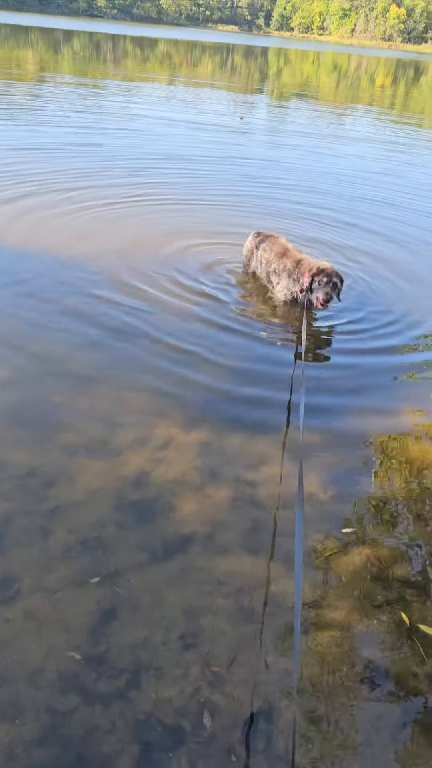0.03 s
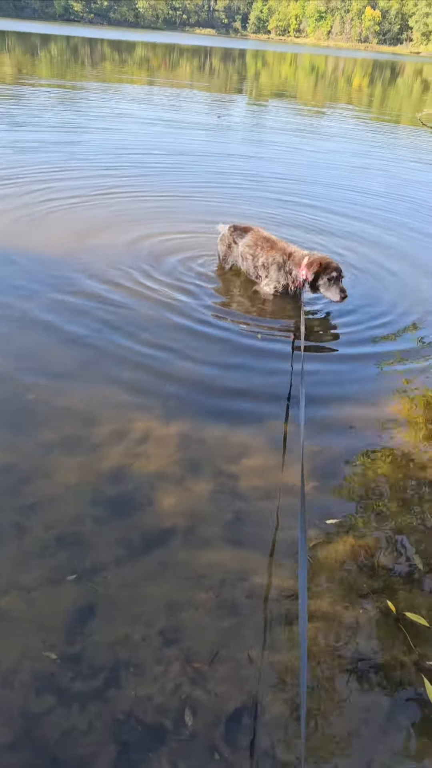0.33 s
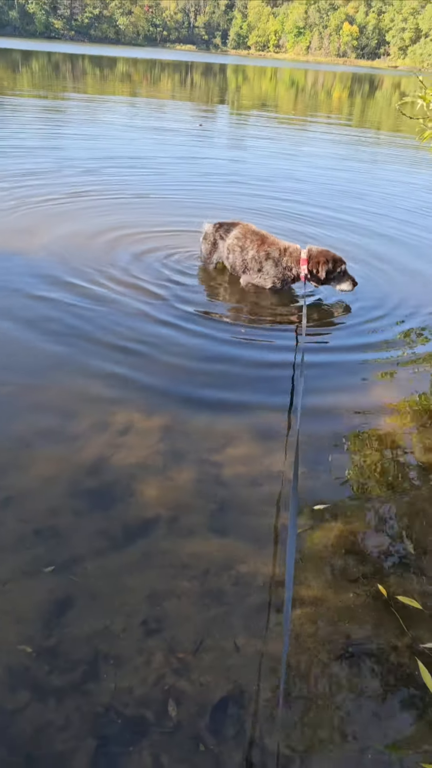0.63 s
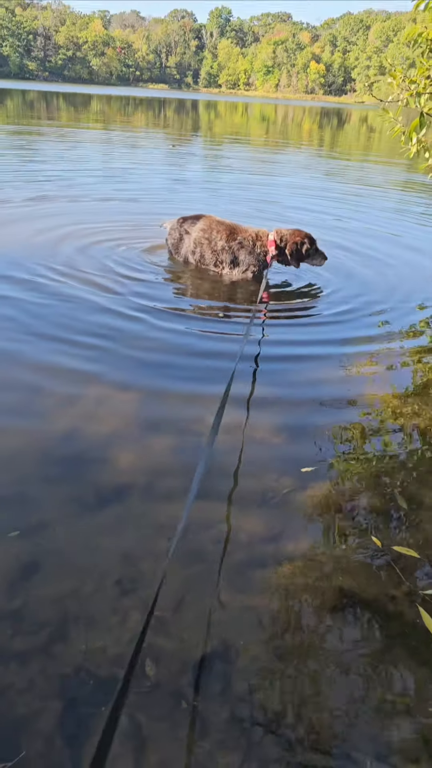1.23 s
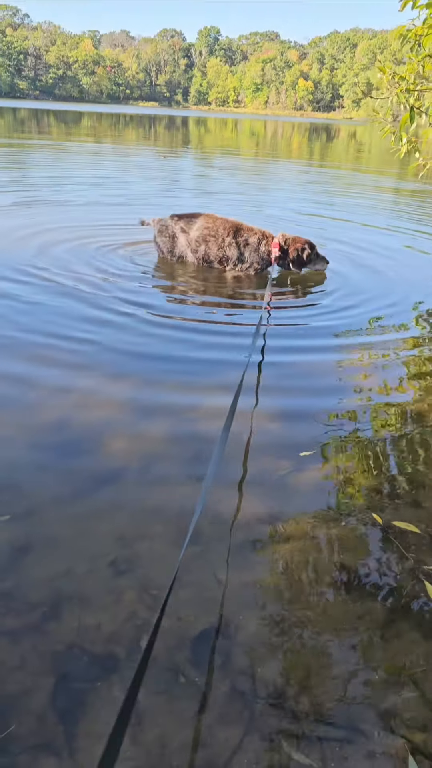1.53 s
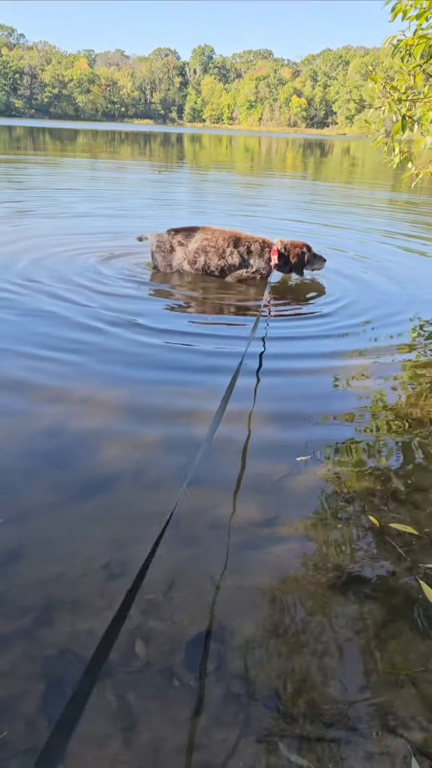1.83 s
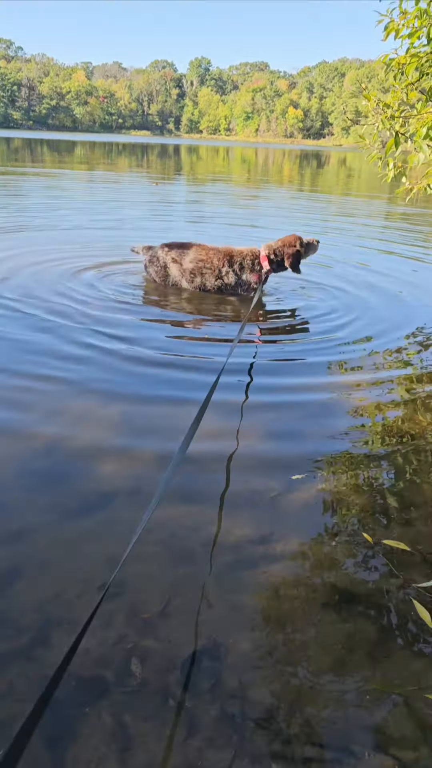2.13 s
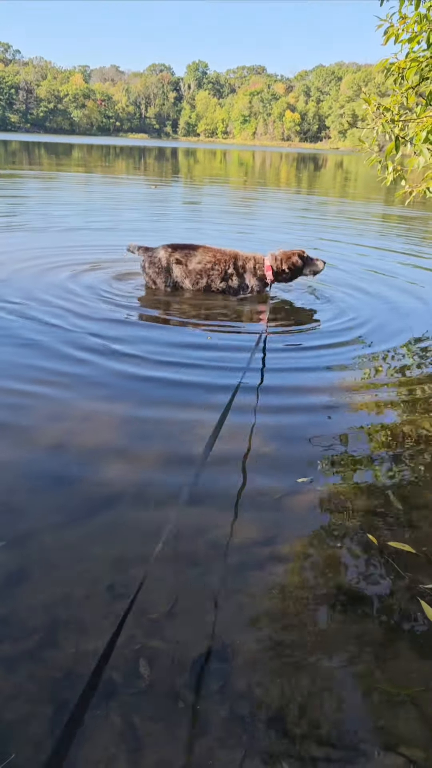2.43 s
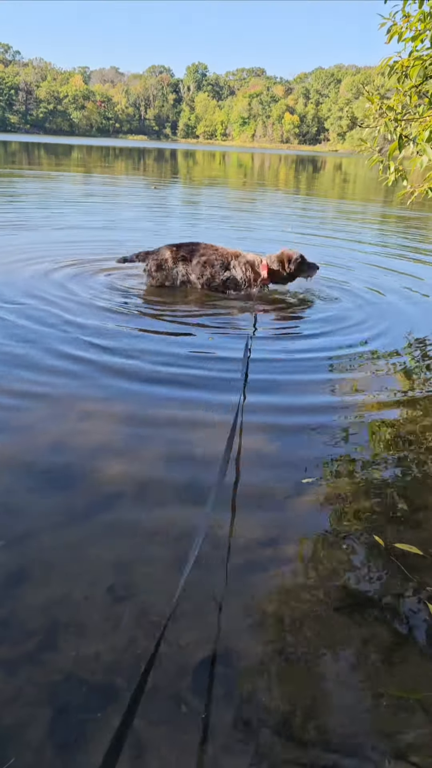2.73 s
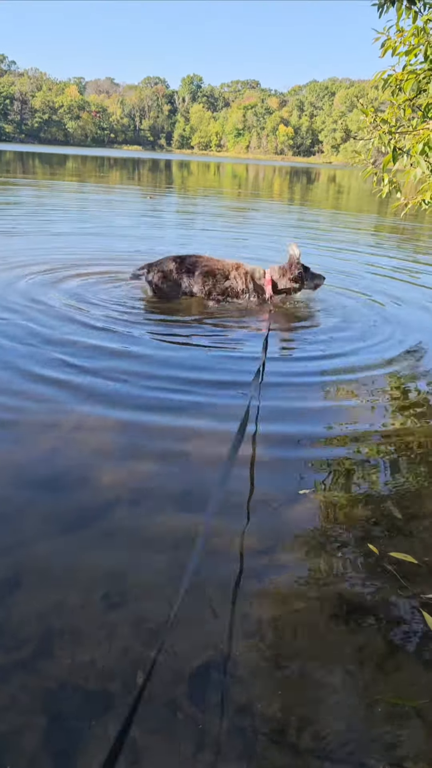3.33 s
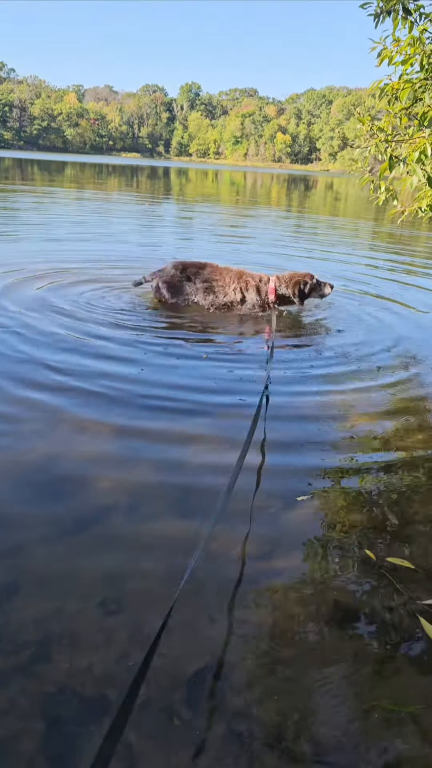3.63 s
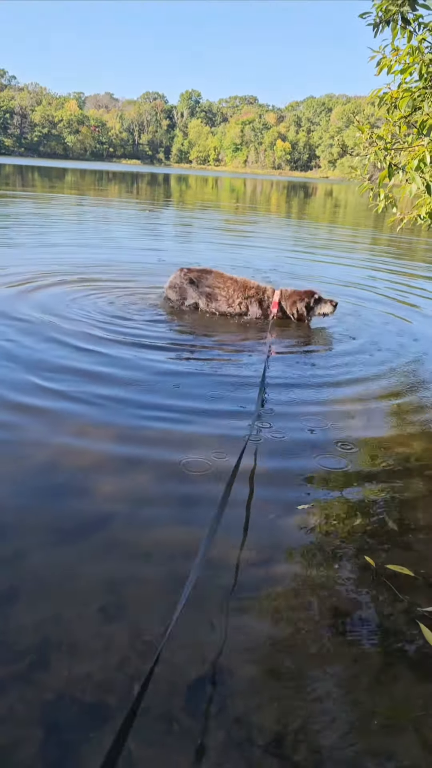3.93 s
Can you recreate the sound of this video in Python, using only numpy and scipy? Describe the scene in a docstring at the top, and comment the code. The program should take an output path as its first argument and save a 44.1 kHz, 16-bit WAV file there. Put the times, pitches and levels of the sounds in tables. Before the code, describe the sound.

A wet dog's head shake is the main sound, heard from a lake shore. Low rumble, faint insects, rustling and lapping run throughout, with soft bumps and leash ticks around 0.5 seconds. Two loud snaps crack close by at 1.6 and 1.8. From 2.5 to 4 seconds, collar tags jingle, wet ears slap and spray patters down among small bubbles. A low hum swells near 2.3 and 3.2.

```python
"""A calm lake, heard in stereo from the shore; a wet dog stands in the water a few metres out.
Low rumble, thin hiss from the trees and far insects run throughout, with rustling and lapping.
The leash ticks, soft bumps sound, a faint thin tone sounds once, and two sharp snaps crack close by.
A low hum swells twice, just before and during a shake of the dog's head from about 2.5 s:
collar tags jingle, wet ears slap, and spray falls back on the lake among small ringing bubbles."""
import sys
import numpy as np
from scipy import signal
from scipy.fft import rfft, irfft
from scipy.io import wavfile

SR = 44100
rng = np.random.default_rng(int(sys.argv[2]) if len(sys.argv) > 2 else 0)


def dump_mix(stems):
    """Bounce the given channels to the path in sys.argv[1] as a 16-bit WAV at rate SR."""
    frames = np.atleast_2d(stems).T  # one column per channel
    limited = np.clip(frames, -1, 1)  # hard clip at full scale
    pcm = np.round(limited * 32767).astype(np.int16)
    wavfile.write(sys.argv[1], SR, pcm)


N = 176400

# Open air at the shore. Each row: frequency in Hz, level in dB.
AIR_COLOUR = [(18, -36), (40, -5.5), (70, -2), (115, -3.5), (150, -11), (200, -16.5), (260, -19),
              (380, -37.5), (520, -34), (950, -42), (1500, -47), (2800, -67), (4000, -47), (5200, -44.5),
              (6500, -50.5), (8200, -45), (10000, -68), (13000, -65), (16000, -64)]
# How alike the air is at the two microphones. Each row: frequency in Hz, correlation.
AIR_LIKENESS = [(100, 0.99), (300, 0.96), (800, 0.37), (2000, 0.11), (8000, 0.068)]
# Far insects in the trees. Each row: centre in Hz, width in Hz, level in dB.
INSECT_BANDS = [(4847, 200, -71.5), (6590, 280, -75)]
# Course of the insects, the rustle and the lapping. Each row: time in seconds, level in dB.
INSECT_LEVEL = [(0, -2.5), (1, 0.5), (1.35, 0.5), (2, 1), (2.4, 4), (4, 7)]
RUSTLE_LEVEL = [(0, -73), (.5, -70), (.6, -61), (.68, -50.5), (.78, -52), (.88, -63), (1.1, -66.5),
                (1.5, -67.5), (1.64, -57.5), (1.74, -64), (1.86, -56.5), (2.0, -57), (2.1, -60.5),
                (2.2, -56.5), (2.35, -63.5), (2.55, -66), (4, -56)]
LAP_LEVEL = [(0, -90), (.45, -59.5), (.6, -56), (.82, -56), (1, -60.5), (1.8, -62.5), (1.96, -59.5),
             (2.15, -64), (2.36, -59), (2.44, -51.5), (2.65, -62), (3.3, -55.5), (4, -65)]
# Spectra of rustle, lapping, bumps, snaps, spray and collar clicks. Each row: frequency in Hz, dB.
RUSTLE_SPECTRUM = [(300, 7), (1000, 3), (2000, 5), (2800, 1.5), (3600, 4), (6000, 3.5), (10000, -6.5),
                   (13000, -3), (16000, -7)]
LAP_SPECTRUM = [(100, 0), (250, -3.5), (500, -6), (900, -19.5), (2500, -36), (8000, -74)]
BUMP_SPECTRUM = [(50, -26), (130, 5.5), (270, 2.5), (550, 2), (850, -14.5), (1050, -20.5), (1300, -10),
                 (1500, -20), (2500, -32.5), (8000, -59)]
SNAP_SPECTRUM = [(100, -3), (500, -2.5), (1300, -3), (2200, 0), (2900, -1.5), (3350, 7.5), (4200, 4),
                 (4900, -0.5), (7200, 3), (9600, -3), (11600, -3), (13000, -33), (16000, -28)]
SPRAY_SPECTRUM = [(2500, 3), (4000, 0.5), (6500, 2), (9000, 2.5), (10600, -10), (12000, 6.5), (15500, 2.5)]
CLICK_SPECTRUM = [(500, -20.5), (3300, -3.5), (4500, -2.5), (6500, 3), (8800, -1.5), (12000, 0), (15500, 7)]
# Ticks of the leash. Each row: start in seconds, level in dB, centre in Hz.
LEASH_TICKS = [(0.202, -43, 960), (0.208, -50.5, 3450), (0.207, -55, 8150), (0.248, -54, 4800),
               (0.678, -34, 1730), (0.679, -44.5, 6840), (2.152, -55.5, 7900)]
# Knocks on the shore. Each row: start in seconds, level in dB, decay in seconds,
# treble tilt in dB per octave, blow over rattle in dB.
SHORE_BUMPS = [(0.5023, -29, 0.0092, -8, 3), (0.514, -38, 0.044, -6, -9), (0.5575, -33, .006, -16, 0),
               (.5615, -37.5, 0.0056, -17, -3), (1.938, -40.5, .0095, 0, 1), (2.392, -41.5, 0.024, -8, -11)]
# The faint tone and the hum's swells. Each row: start and length in seconds, pitch in Hz, level in dB.
FAINT_TONE = [(1.509, 0.073, 1950, -61)]
HUM_SWELLS = [(2.275, 0.18, 121.4, -38.5), (3.151, .33, 120.4, -38.5)]
# Close snaps. Each row: start in seconds, left and right level in dB,
# left and right treble tilt in dB per octave, body pitch in Hz, body level in dB.
CLOSE_SNAPS = [(1.5864, 0.5, 11, -8, 6.5, 2520, -22), (1.8083, 11, 14, -4.5, 0.5, 1330, -17.5)]
# Bubbles in the lake. Each row: start in seconds, pitch in Hz, level in dB, decay in seconds,
# rise in octaves per second.
LAKE_BUBBLES = [(1.939, 255, -40.5, 0.019, 2), (2.93, 260, -36, 0.016, 7.9), (2.970, 630, -39.5, 0.024, 29),
                (3.278, 1800, -47, 0.0088, 18), (3.334, 249, -39.5, 0.018, 3.6),
                (3.408, 1200, -46, 0.008, 19), (3.431, 1780, -36, 0.0051, 36),
                (3.519, 1610, -47, 0.0061, 2), (3.552, 500, -31, 0.0072, 0.97),
                (3.554, 1305, -44, 0.023, 0.91), (3.648, 640, -44, 0.0074, 9.4),
                (3.71, 596, -40.5, 0.0066, 7.6), (3.737, 423, -37.5, 0.0046, 20),
                (3.795, 700, -42.5, 0.0093, 5.1), (3.791, 1064, -48, 0.011, 6.9),
                (3.846, 1250, -30, 0.003, 78), (3.905, 650, -48.5, 0.0081, 6.1),
                (3.948, 1083, -42.5, 0.011, 8.9)]
# Water falling around the dog. Each row: time in seconds, patter level in dB, plop level in dB.
SPRAY_LEVELS = [(2.4, -110, -110), (2.55, -73, -63.5), (2.7, -61, -68), (2.9, -65, -63.5),
                (3.0, -61, -46.5), (3.045, -50, -72), (3.15, -49.5, -51), (3.22, -55, -61.5),
                (3.33, -51, -57.5), (3.41, -53, -51.5), (3.5, -50, -61), (3.57, -57.5, -50),
                (3.62, -58, -52.5), (3.705, -44, -55), (3.73, -60, -54.5), (3.82, -55.5, -53),
                (4, -72, -67)]
# Modes of each metal piece on the collar. Each row: pitch in Hz, level in dB, seconds to fall 60 dB.
METAL_MODES = { "tag": [(6230, -19, .06), (6975, -1.5, .11), (7060, -2, .1), (7320, -7, .08),
               (7450, -7, .08), (10230, -11, .14), (11600, -12, .07), (12935, -5.5, .14),
               (13000, -5.5, .14), (13120, -9, .09), (15385, -8, .11), (15490, -9, .1)],
               "ring": [(5890, -10, .06), (6088, -2, .07), (6240, -9, .05), (6462, -8, .05),
               (6540, -7, .06), (7130, -10, .06), (10900, -15, .08), (12470, -8, .09), (14970, -8, .08)],
               "clip": [(4500, -16, .07), (6590, -6, .06), (6713, -5, .08), (7520, -13, .05),
               (9800, -14, .09), (11750, -11, .06), (12730, -8.5, .12), (13350, -10, .07),
               (14730, -11, .07), (15140, -4, .13)]}
# Strikes on the collar. Each row: start in seconds, piece, level in dB, treble tilt in dB per octave,
# relative click level in dB, right over left in dB.
COLLAR_CLINKS = [(2.566, "tag", -48, -0.5, 8, -2), (2.579, "tag", -36, 8, 8, -1.5),
                 (2.621, "tag", -44.5, -1.5, 3, 3.5), (2.696, "tag", -46, -9, 4, 4),
                 (2.714, "tag", -40, -6, -30, 5), (2.752, "tag", -32.5, -5.5, -8.5, -2),
                 (2.7659, "tag", -33, -10.5, -11.5, 7.5), (2.8112, "ring", -38, -4, 1, -1),
                 (2.829, "ring", -45.5, -4.5, -4, 13), (2.859, "tag", -44, -2.5, -4, 0),
                 (2.906, "tag", -46.5, -1, 0.5, -3), (2.9621, "tag", -33.5, 5, 8, -1),
                 (2.9741, "tag", -31, -16, -21, 9.5), (2.989, "tag", -32, -0.5, -15, 1),
                 (3.004, "ring", -36.5, -2.5, 1, 0), (3.108, "clip", -31.5, -7, -20, 4),
                 (3.1167, "clip", -30, -1, -10, -6), (3.132, "ring", -26, -4.5, -8.5, -1),
                 (3.1349, "ring", -32, -8, -18, 9), (3.3046, "clip", -37, -5, -17, 2.5),
                 (3.317, "clip", -41, 0, 5, 0), (3.3924, "clip", -38, 1.5, 5, 2),
                 (3.405, "clip", -32.5, -1, 0.5, 1), (3.633, "clip", -51, -4, 6, 0),
                 (3.7141, "ring", -44, -0.5, 11, 0), (3.8937, "clip", -28, -5, -17, 1.5),
                 (3.938, "clip", -45.5, 8, 10, -9), (3.944, "clip", -34, 2, 3, 0)]
# Wet ears and jowls. Each row: start in seconds, bass, middle and treble level in dB,
# decay in seconds, blow over splatter in dB, right over left in dB.
EAR_SLAPS = [(2.695, -60, -46, -63, 0.0054, -8, 10), (2.779, -47, -41.5, -38, .0051, -15, 1),
             (2.813, -50, -51, -40, 0.0043, 1, 5), (2.860, -60, -43, -33, 0.002, 9, -1),
             (2.926, -37, -38.5, -63, 0.0041, -21, 10.5), (2.9356, -40, -41, -34.5, 0.0051, 0, 4),
             (3.060, -73, -49, -41.5, 0.01, -18, 1), (3.0655, -31.5, -31.5, -44, 0.0025, 9, -0.5),
             (3.1425, -30, -35, -47, 0.0049, 0, 5.5), (3.1705, -29, -28.5, -26, 0.0036, -2, -1.5),
             (3.207, -34.5, -45, -50, 0.0024, 5, -2), (3.2662, -37, -26, -36, 0.0034, 3, -0.5),
             (3.341, -38, -42.5, -44, 0.009, -5, 5.5), (3.3763, -24, -24, -26.5, 0.002, 0, -2),
             (3.431, -53, -28, -55, 0.002, -7, -2), (3.478, -36, -32, -37, 0.0034, 13, -1),
             (3.537, -39, -37, -38.5, 0.0063, -15, -2), (3.5425, -30.5, -36, -31.5, .002, 10, 10),
             (3.5457, -24, -26.5, -32, 0.002, 9, 16.5), (3.5497, -29, -29, -54, 0.002, 0, -5),
             (3.564, -45, -60, -66, 0.005, -8, 9)]
# Bass, middle and treble of a slap. Each row: low and high edge in Hz.
SLAP_BANDS_HZ = [(180, 670), (1200, 2360), (3300, 8700)]
# Water flung off the head. Each row: start in seconds, level in dB, centre in Hz, length in seconds.
FLINGS = [(2.825, -45, 5930, 0.015), (2.992, -45, 5700, .03), (3.055, -46, 4330, 0.048),
          (3.244, -55, 5740, 0.032), (3.262, -47, 6400, 0.023), (3.484, -47, 6400, .012),
          (3.603, -45, 5900, .012), (3.657, -51, 7180, .012), (3.686, -46, 5400, .02),
          (3.713, -43, 4740, 0.017)]


def amp(db):
    """Decibels to gain."""
    return 10 ** (np.asarray(db) / 20)


def unit(x):
    """Scales to rms 1."""
    return x / np.sqrt(np.mean(x ** 2) + 1e-20)


def read(points, hz):
    """Reads a spectrum on a log-frequency axis."""
    knots_hz, values = np.transpose(points)
    return np.interp(np.log(hz + 1), np.log(knots_hz + 1), values)


def level(points, column=1):
    """Gain over time from a dB curve."""
    rows = np.array(points)
    return amp(np.interp(np.arange(N) / SR, rows[:, 0], rows[:, column]))


def add(mix, start, sound, right_db=0):
    """Places a sound in the stereo mix."""
    part = mix[:, round(start * SR):][:, :sound.shape[-1]]
    part += (amp([[-right_db / 2], [right_db / 2]]) * sound)[:, :part.shape[1]]


def colour(x, points, tilt_db=0):
    """Causal filter of unit energy with the given spectrum, tilted above about 3 kHz."""
    hz = abs(np.fft.fftfreq(4096, 1 / SR))
    log_gain = np.log(amp(read(points, hz) + tilt_db * np.log2(1 + hz / 3000)))
    minimum_phase = np.exp(np.conj(signal.hilbert(log_gain)))
    taps = np.fft.ifft(minimum_phase).real[:len(hz) // 2]
    return signal.fftconvolve(x, taps[None] / np.linalg.norm(taps), axes=1)[:, :x.shape[1]]


def band(x, lo_hz, hi_hz):
    """Band-pass."""
    sos = signal.butter(2, [lo_hz, min(hi_hz, SR / 2 - 1000)], "band", fs=SR, output="sos")
    return signal.sosfilt(sos, x)


def pair(size, apart=0.53):
    """Noise at two microphones: identical when apart is 0, unrelated at 1."""
    mid, side = rng.standard_normal((2, size))
    return unit(np.array([mid + apart * side, mid - apart * side]))


def blow(rattle, start, db):
    """One firm push, alike on both sides, on top of a loose rattle."""
    out = rattle / np.linalg.norm(rattle, axis=1, keepdims=True)
    out[:, round(start * SR)] -= amp(db)
    return out


def echo(x, t60=0.13):
    """Thin, quick scatter from the bank and the trees."""
    t = np.arange(SR // 2) / SR
    tail = rng.standard_normal((2, len(t))) * amp(-60 * t / t60) * (t > .003)
    return signal.fftconvolve(x, tail / np.linalg.norm(tail[0]), axes=1)[:, :N]


def air(db=-46, sway_db=1.5):
    """Swaying low rumble, alike at both microphones, under a thin wide hiss from the trees."""
    hz = np.fft.rfftfreq(N, 1 / SR)
    left, other = rfft(rng.standard_normal((2, N)))
    alike = np.clip(read(AIR_LIKENESS, hz), -1, 1)
    right = alike * left + np.sqrt(1 - alike ** 2) * other
    spectrum = np.array([left, right]) * amp(read(AIR_COLOUR, hz))
    low = 1 / (1 + (hz / 250) ** 4)
    sway = unit(irfft(rfft(rng.standard_normal(N)) * (hz < 9), N))
    rumble = irfft(spectrum * low, N) * amp(sway_db * sway)
    hiss = irfft(spectrum * (1 - low), N)
    return amp(db) * unit(rumble + hiss) * amp([[.4], [-.4]])


def insects(throb_db=2):
    """A thin, throbbing shrill from far off in the trees, slowly growing."""
    throb = unit(amp(throb_db * unit(band(rng.standard_normal(N), 11, 44))))
    shrill = sum(amp(db) * unit(band(pair(N, 1.0), hz - width / 2, hz + width / 2))
                 for hz, width, db in INSECT_BANDS)
    return level(INSECT_LEVEL) * throb * shrill


def rustle():
    """A soft, wide rustle near the microphones."""
    return level(RUSTLE_LEVEL) * colour(pair(N, 1.0), RUSTLE_SPECTRUM)


def lapping():
    """Low lapping water, near the centre of the stereo image."""
    return level(LAP_LEVEL) * colour(pair(N, 0.073), LAP_SPECTRUM)


def leash(decay=.004):
    """Small ticks of the leash, each a narrow burst of noise."""
    out, t = np.zeros((2, N)), np.arange(SR // 5) / SR
    for start, db, hz in LEASH_TICKS:
        burst = 3 * pair(len(t)) * np.exp(-t / decay)
        add(out, start, amp(db) * band(burst, hz * .84, hz * 1.19))
    return out


def bumps():
    """Dull knocks on the shore, each a blow and a dying rattle."""
    out, t = np.zeros((2, N)), np.arange(SR // 5) / SR
    for start, db, decay, tilt_db, blow_db in SHORE_BUMPS:
        shape = np.exp(-t / decay)
        impact = blow(pair(len(t), 0.31) * shape, 0, blow_db)
        knock = unit(colour(impact, BUMP_SPECTRUM, tilt_db))
        add(out, start, amp(db) * knock * np.sqrt(np.mean(shape ** 2)), right_db=-1)
    return out


def faint_tone():
    """One faint, blurred tone near 1950 Hz, just before the first snap."""
    out = np.zeros((2, N))
    for start, length, hz, db in FAINT_TONE:
        t = np.arange(0, length, 1 / SR)
        tone = unit(band(pair(SR // 4), hz - 50, hz + 50))[:, :len(t)]
        add(out, start, amp(db) * np.sin(np.pi * t / length) * tone)
    return out


def snaps(left_lag_s=.00044, reflection_s=0.0029, echo_db=-28.5):
    """Close cracks with a brief hollow ring and one near reflection, reaching the right side first."""
    out, t = np.zeros((2, N)), np.arange(SR // 20) / SR
    for start, left_db, right_db, left_tilt, right_tilt, body_hz, body_db in CLOSE_SNAPS:
        crack = rng.standard_normal((2, len(t))) * np.exp(-t / 0.0017)
        crack *= amp(-10) / np.linalg.norm(crack, axis=1, keepdims=True)
        crack[:, 0] += 1  # the direct pulse, 10 dB over its noisy tail
        crack[:, round(reflection_s * SR)] += amp(-20)
        body = amp(body_db) * np.exp(-t / 0.0015) * np.cos(2 * np.pi * body_hz * t)
        left = body + amp(left_db) * colour(crack, SNAP_SPECTRUM, left_tilt)
        right = body + amp(right_db) * colour(crack, SNAP_SPECTRUM, right_tilt)
        add(out, start + left_lag_s, left * [[1], [0]])
        add(out, start, right * [[0], [1]])
    return out + amp(echo_db) * echo(out)


def bubbles():
    """Single bubbles in the lake ring and rise in pitch as they die away."""
    out, t = np.zeros((2, N)), np.arange(SR // 25) / SR
    for start, hz, db, decay, rise in LAKE_BUBBLES:
        turns = np.cumsum(hz * 2 ** (rise * np.minimum(t, 3 * decay))) / SR
        shape = (1 - np.exp(-t / 0.00026)) * np.exp(-t / decay) * (1 - (t / t[-1]) ** 4)
        tone = np.sin(2 * np.pi * turns + np.array([[0], [.6]]))
        add(out, start, amp(db) * shape * tone, right_db=1)
    return out


def hum():
    """A low hum swells and fades, gliding slightly upward."""
    out = np.zeros((2, N))
    for start, length, hz, db in HUM_SWELLS:
        t = np.arange(0, length, 1 / SR)
        tone = np.sin(2 * np.pi * hz * t * (1 + 0.17 * t))
        add(out, start, amp(db) * np.sin(np.pi * t / length) * tone)
    return out


def drops(lo_hz, hi_hz, per_s, cycles, rise, pitches, per_group, clump_hz=60, clump_db=3.5):
    """A shower of tiny pings; drops of like size land in clumps."""
    out = np.zeros((2, N))
    for group in np.geomspace(lo_hz, hi_hz, pitches).reshape(-1, per_group):
        knots = np.minimum(rng.standard_normal(int(clump_hz * N / SR) + 2), 2)
        clump = amp(clump_db * np.interp(np.arange(N) * clump_hz / SR, np.arange(len(knots)), knots))
        for hz in group:
            age = np.arange(int(5 * cycles * SR / hz) + 2) * hz / SR / cycles  # in decay times
            phase = 2 * np.pi * cycles * (age + rise * age ** 2) + rng.normal(0, 1.0, (2, 1))
            ping = (1 - np.exp(-age * 8)) * np.exp(-age) * np.sin(phase)
            lands = rng.random(N) < per_s / pitches / SR
            hits = clump * lands * amp(2.8 * np.minimum(rng.exponential(1, N), 4))
            out += signal.oaconvolve(hits[None], ping * np.sqrt(hz), axes=1)[:, :N]
    return unit(out)


def spray():
    """Spray patters on the lake around the dog, and the churned water plops."""
    patter = drops(3176, 15150, per_s=1800, cycles=9, rise=0.015, pitches=24, per_group=12)
    patter = unit(colour(patter, SPRAY_SPECTRUM))
    plops = drops(372, 2718, per_s=750, cycles=6.5, rise=0.018, pitches=30, per_group=6)
    return level(SPRAY_LEVELS) * patter + level(SPRAY_LEVELS, column=2) * plops


def links(t, tilt_db, count=10, t60=.06):
    """Small links and rivets ring briefly at new pitches with every clink."""
    hz = rng.uniform(5400, 15500, (count, 1))
    phase = 2 * np.pi * rng.random((2, count, 1))
    fade = amp(-14 + tilt_db * np.log2(hz / 9000) - 60 * t / t60)
    return (fade * np.sin(2 * np.pi * hz * t + phase)).sum(1)


def collar(detune=.002, mute_s=.062, click_s=0.0069, chatter_s=0.019, chatter_per_s=2800):
    """Each clink is a click, a brief chatter of metal on metal, and the ring of one piece."""
    out, t = np.zeros((2, N)), np.arange(SR // 4) / SR
    for start, piece, db, tilt_db, click_db, right_db in COLLAR_CLINKS:
        ring = links(t, tilt_db)
        for hz, mode_db, t60 in METAL_MODES[piece]:
            phase = 2 * np.pi * rng.random() + np.array([[0], [1.3]]) * rng.standard_normal()
            swing = unit(1 + .5 * unit(band(rng.standard_normal(len(t)), 35, 186)))
            fade = amp(mode_db + tilt_db * np.log2(hz / 9000) - 60 * t / t60)
            detuned_hz = hz * (1 + detune * rng.standard_normal())
            ring += swing * fade * np.sin(2 * np.pi * detuned_hz * t + phase)
        # The piece stops ringing as it falls back against the collar.
        ring *= (1 - np.exp(-t / 0.00064)) * np.exp(-(t / mute_s) ** 2)
        contacts = unit(pair(len(t), 0.71) * (rng.random(len(t)) < chatter_per_s / SR))
        chatter = amp(-3) * contacts * np.exp(-t / chatter_s)
        click = colour(pair(len(t), 1.0) * np.exp(-t / click_s) + chatter, CLICK_SPECTRUM, tilt_db)
        add(out, start, amp(db) * (ring + amp(click_db) * click), right_db)
    return out


def ears(tail_db=-26, tail_s=0.041):
    """Wet slaps: one blow and its splatter sound as a low thud, a hollow smack and a fizz."""
    out, t = np.zeros((2, N)), np.arange(SR // 8) / SR
    for start, bass_db, mid_db, top_db, decay, blow_db, right_db in EAR_SLAPS:
        shape = (1 - np.exp(-t / 0.0013)) * (np.exp(-t / decay) + amp(tail_db) * np.exp(-t / tail_s))
        splatter = pair(len(t), 1.0) * shape
        slap = blow(splatter, .0011, blow_db)
        for db, drive, edges in zip((bass_db, mid_db, top_db), (slap, slap, splatter), SLAP_BANDS_HZ):
            add(out, start, amp(db) * unit(band(drive, *edges)) * np.sqrt(np.mean(shape ** 2)), right_db)
    return out


def spatter(drops_per_s=2000):
    """Each fling of water from the swinging head lands as a short, tight burst of drops."""
    out = np.zeros((2, N))
    for start, db, hz, length in FLINGS:
        t = np.arange(0, length, 1 / SR)
        hits = pair(len(t), 0.55) * (rng.random(len(t)) < drops_per_s / SR)
        burst = unit(band(hits * (1 - t / length), hz * 0.69, hz * 1.08))
        add(out, start, amp(db) * burst, right_db=1)
    return out


def scene(right_lag_s=.00012, echo_db=-10.5):
    """Dog and water reach the left microphone first and echo off the bank; the shore lies all around."""
    left, right = collar() + ears() + spatter() + spray() + bubbles() + lapping()
    lake = np.array([left, np.pad(right, (round(right_lag_s * SR), 0))[:N]])
    lake += amp(echo_db) * echo(lake)
    shore = bumps() + leash() + rustle() + snaps()
    return lake + shore + air() + insects() + faint_tone() + hum()


def record(dry, ceiling=.86, edge_hz=15750):
    """The close snaps overload softly; a steep low-pass takes off the highest treble."""
    overloaded = ceiling * np.tanh(dry / ceiling)
    taps = signal.firwin(201, edge_hz, window=("kaiser", 8), fs=SR)
    return signal.oaconvolve(overloaded, taps[None], "same", axes=1)


dry = scene()
out = record(dry)
dump_mix(out)
```